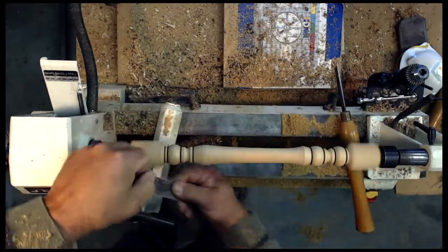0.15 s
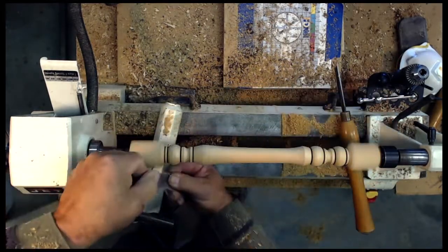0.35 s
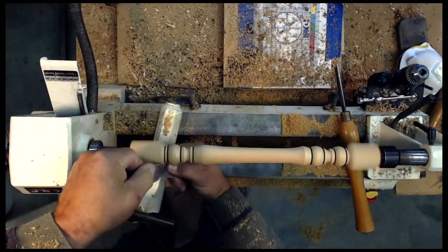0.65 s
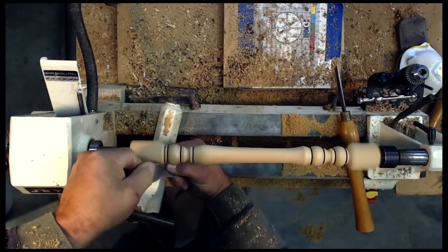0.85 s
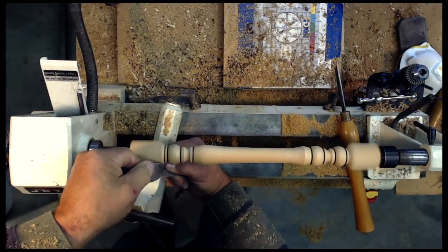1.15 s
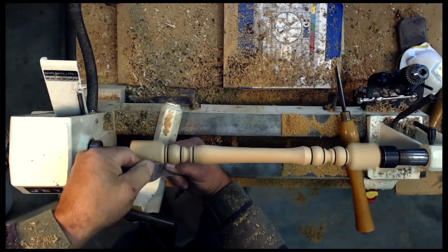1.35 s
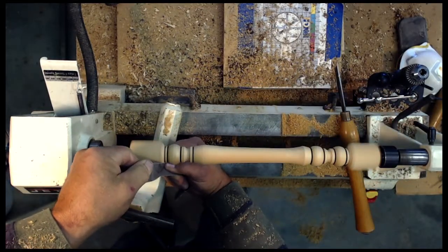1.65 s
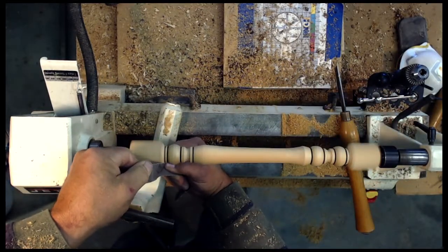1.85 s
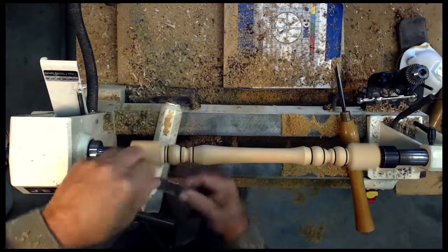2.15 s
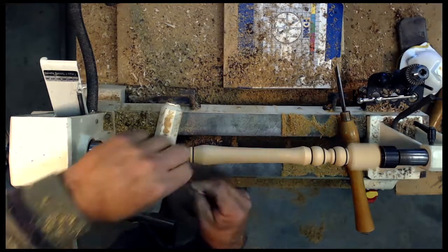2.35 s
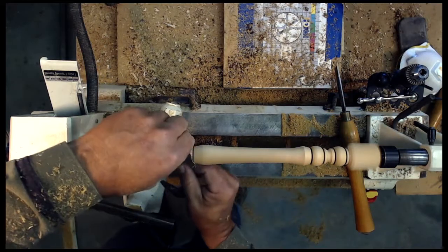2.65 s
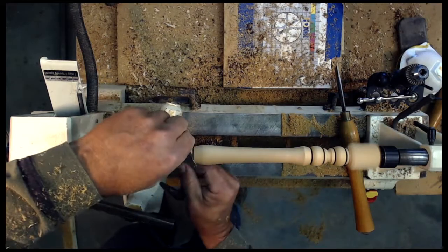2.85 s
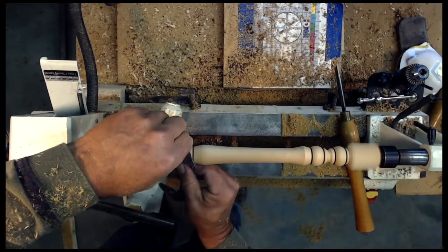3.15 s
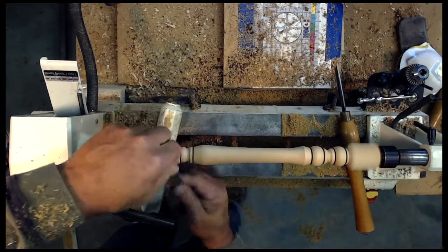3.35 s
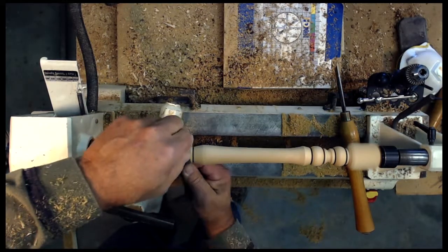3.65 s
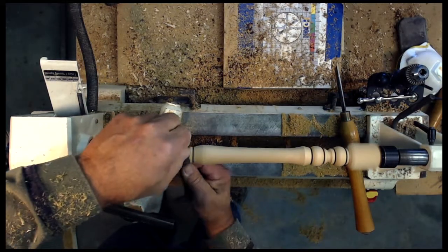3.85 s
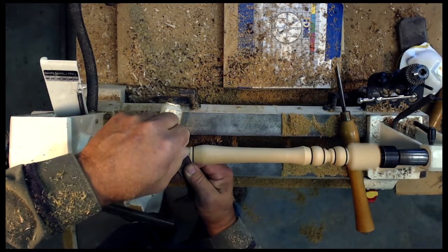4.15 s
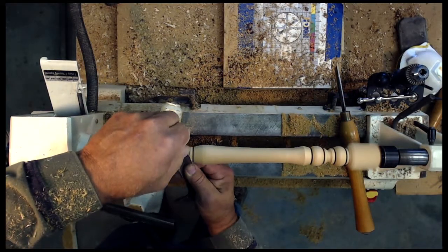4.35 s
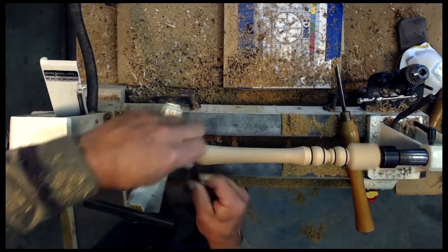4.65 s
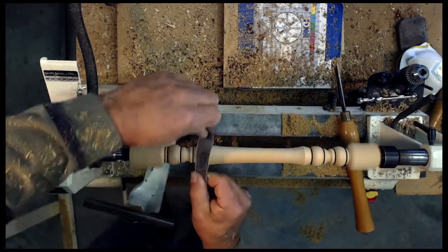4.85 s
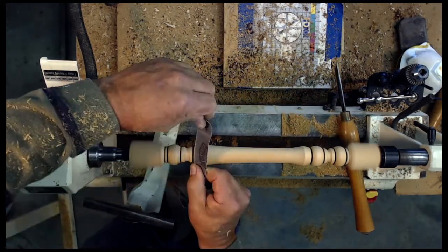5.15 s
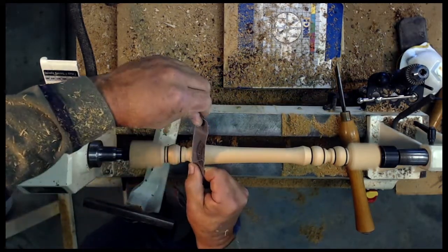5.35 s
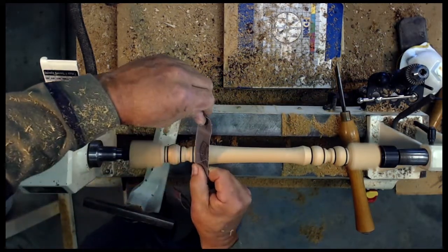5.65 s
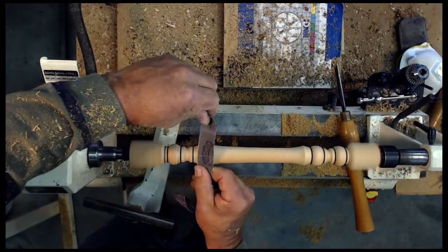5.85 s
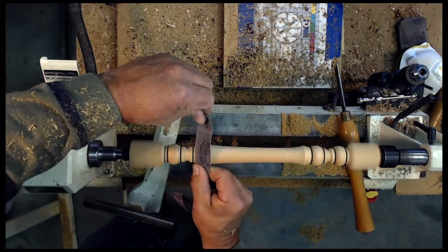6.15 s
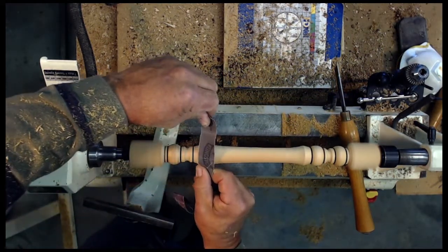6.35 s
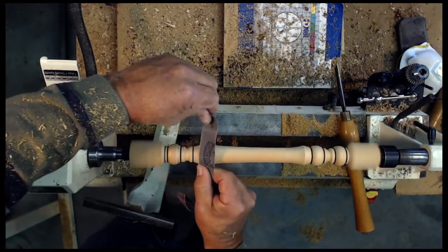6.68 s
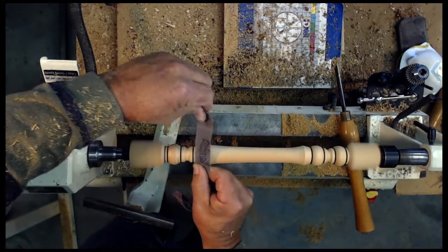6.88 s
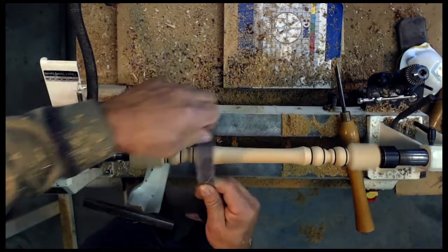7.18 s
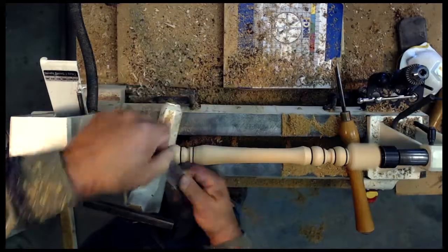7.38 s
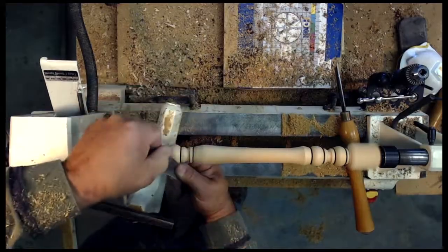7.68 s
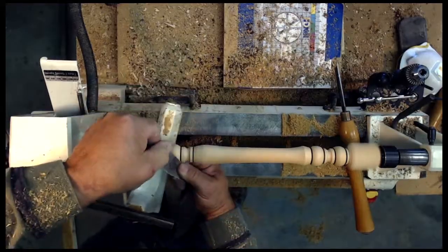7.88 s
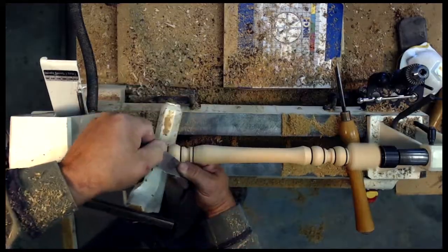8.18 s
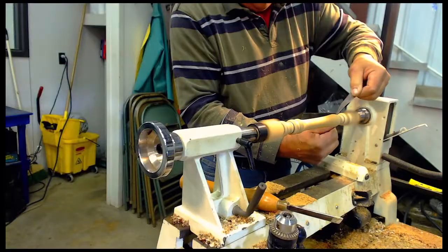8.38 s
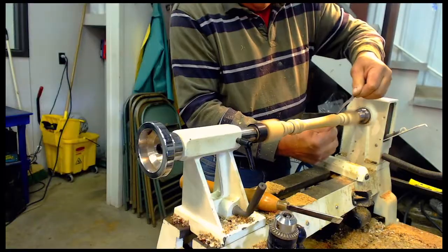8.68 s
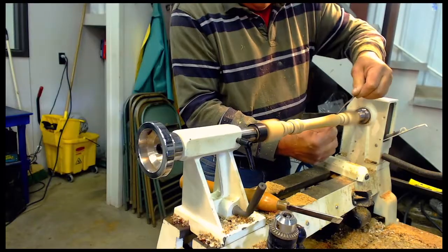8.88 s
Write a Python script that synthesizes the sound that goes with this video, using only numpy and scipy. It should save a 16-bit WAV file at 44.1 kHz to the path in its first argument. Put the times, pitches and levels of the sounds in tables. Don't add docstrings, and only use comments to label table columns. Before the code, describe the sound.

In a workshop, a wood lathe whirs at constant speed, humming and whistling. Sandpaper is pushed on and lifted off the turning spindle, making rough fluttering hisses with a hollow woody rasp beneath and occasional brief squeals. Middle strokes are much lighter, the last is hard and long. Close, narrow, low-quality mono pickup with watery artifacts and two tiny dropouts.

```python
import sys
import numpy as np
from scipy import signal
from scipy.fft import rfft, irfft
from scipy.io import wavfile
from scipy.ndimage import uniform_filter1d, map_coordinates

SR = 44100
rng = np.random.default_rng(int(sys.argv[2]) if len(sys.argv) > 2 else 0)


def gain_from_db(level_db):
    decades = np.asarray(level_db, float) / 20
    return 10 ** decades


def transcribe(signal):
    frames = np.atleast_2d(signal).T
    limited = np.clip(frames, -1, 1)
    pcm = np.round(limited * 32767).astype(np.int16)
    wavfile.write(sys.argv[1], SR, pcm)


N = 397782

TURN_HZ = 66.97
WHINE_HZ = 1246.3
COMB_HZ, STEP_HZ, PARTNER_HZ = 3470, 319.3, 79
LOUDEST_WHISTLE = 3
ROAR_DB = -34
SHADE_S, SHADE_LENGTH_S, SHADE_DB = 4.92, .07, -2.5
LIFT_OFF_S = .15
TUG_RISE_S, TUG_FALL_S = 0.0083, 0.012
WOOD_LAG, USUAL_DB = .3, -17.5
SING_Q = 30
MIC_LIMIT = 1.5
PACKET_S, PACKET_MID = 1024 / 48000, .58
THIN_FADE_S, FADE_IN_S = .02, .017

# time in seconds, motor whine level in dB, third shaft order level in dB.
LOAD = [(0.0, -46, -70), (.22, -41, -60), (1.48, -42.5, -52.5), (2.28, -43.5, -56.5), (3.2, -40.5, -55),
        (4.42, -41.5, -55.5), (4.67, -42.5, -51.5), (4.92, -43, -57), (5.33, -40.5, -48.5),
        (5.8, -49.5, -46.5), (6.35, -44, -49), (6.53, -51.5, -53), (6.86, -47.5, -46.5), (7.16, -46, -50.5),
        (7.28, -43, -59), (7.74, -42, -58), (8.82, -44.5, -57.5), (9.02, -36.5, -59)]
# order, level in dB re the third.
LOADED_ORDERS = [(3, 0), (5, -11.5), (11, -11), (12, -3.5), (13, -5.5), (14, -10), (16, -15), (19, -7.5),
                 (20, -11)]
# frequency in Hz, level in dB.
MAINS = [(60, -62), (120, -63), (180, -67.5), (240, -52.5), (300, -66), (360, -76)]
# order, level in dB.
SHAFT_ORDERS = [(1, -61.5), (2, -64), (4, -58.5), (6, -70), (9, -56.5)]
# frequency in Hz, level in dB.
BELT = [(88, -82.5), (100, -79), (131, -71), (150.3, -63), (211, -71.5), (277, -62.5), (411, -66),
        (681, -65), (1082, -54)]
# frequency in Hz, level in dB.
BEARINGS = [(1367, -48), (1647, -53), (2304, -56), (2912, -58), (3230, -55), (3623, -55), (3951, -58),
            (4016, -57), (4904, -53)]
# whistle level in dB, partner level in dB.
WHISTLES = [(-63.5, -57.5), (-49.5, -53), (-52.5, -52), (-43, -53.5), (-50, -50), (-43.5, -53.5),
            (-56, -53), (-52, -52.5), (-52.5, -54), (-49, -46.5)]
# time in seconds, gain in dB.
WHISTLE_SWELL = [
    (0, 7),
    (.25, 2.5),
    (.5, -1.5),
    (2.2, -3),
    (2.45, 3.5),
    (2.8, 1),
    (4.7, -7),
    (7.1, -7),
    (7.4, -0.5),
]
# frequency in Hz, density in dB per Hz.
ROAR = [(15, -54.5), (25, -17), (58, -28), (161, -17), (235, -11.5), (327, -20.5), (603, -11), (944, -13),
        (1250, -8), (1480, -10), (2100, -10), (3370, -10.5), (4910, -5.5), (5400, -10), (6520, -9),
        (7000, -15), (9100, -54.5), (15400, -120)]
# time in seconds, level in dB.
STROKES = [
    [(0.73, -43), (0.748, -20.5), (0.916, -13), (1.254, -17), (1.45, -16), (1.526, -20), (1.944, -17.5),
     (2.108, -20.5), (2.16, -39.5)],
    [(2.77, -39.5), (2.832, -26.5), (2.884, -7.5), (3.132, -16.5), (3.164, -10), (3.272, -19),
     (3.354, -22.5), (3.372, -30.5), (3.42, -33.5)],
    [(3.77, -52.5), (3.806, -23), (3.86, -18), (4.052, -19), (4.128, -36.5), (4.178, -41), (4.192, -16),
     (4.298, -15), (4.36, -18)],
    [(4.47, -20.5), (4.48, -16), (4.58, -11), (4.694, -18.5), (4.72, -37.5)],
    [(4.96, -49.5), (5.02, -25), (5.376, -25.5), (5.394, -18.5), (5.454, -24.5), (6.184, -25.5),
     (6.194, -19.5), (6.324, -26), (6.52, -20.5)],
    [(6.59, -23), (6.606, -23.5), (6.68, -31.5), (6.71, -28), (6.91, -25), (7.068, -29), (7.136, -24),
     (7.24, -36)],
    [(7.67, -32.5), (7.73, -8.5), (7.902, -20.5), (8.108, -20), (8.418, -21), (8.658, -14), (8.804, -23),
     (9.012, -13), (9.02, -22)],
]
# time in seconds, change in dB.
TUGS = [(.836, 2.5), (.924, 4.5), (1.442, 1), (1.924, 1.5), (5.015, 2), (5.035, -6), (5.058, 0), (5.41, 2),
        (5.435, -3), (5.484, 7.5), (5.68, 3.5), (6.206, 1), (6.514, 2), (6.72, 3.5), (7.134, 2), (7.73, 4),
        (7.86, 0.5), (8.03, -3), (8.078, 4), (8.67, -1), (8.928, -2)]
# time in seconds, wood body level in dB re hiss, hiss centre in Hz,
# lift there in dB, turn-to-turn likeness from 0 to 1.
GRIP = [(.75, -17.5, 4270, 1, 0.6), (1.15, -13.5, 5460, 2, 0.64), (1.6, -14, 5520, 2.5, 0.74),
        (1.9, -12.5, 5710, 3.5, 1), (2.101, -13, 5140, 1, .2), (2.9, -15, 5690, 7.5, 0.4),
        (3.149, -6.5, 5730, 4, .4), (3.901, -18.5, 5640, 2.5, .3), (4.3, -14.5, 5610, 5, 0.6),
        (4.65, -15.5, 6080, 7, .4), (5.1, -15, 6150, 2.5, 0.4), (6.201, -14, 6250, 6.5, .3),
        (7.1, -14, 5930, 9, 0.2), (7.73, -22.5, 4860, 9, .4), (7.92, -12, 5220, 6.5, 0.2),
        (8.159, -8.5, 4230, 1.5, 0.67), (8.669, -14.5, 5660, 9, 0.62), (9.0, -11, 5580, 1.5, .6)]
# frequency in Hz, density in dB per Hz.
GRIT = [(1650, -45), (2800, -10.5), (3140, -17.5), (3470, -7), (4000, -3), (5630, -4), (6510, -1),
        (7000, -2.5), (9100, -29.5), (15400, -120)]
# frequency in Hz, density in dB per Hz.
WOOD = [(290, -62.5), (500, -34.5), (848, -13), (1060, -19), (1210, -15), (1870, -2), (2100, -8),
        (3600, -1), (4680, -18), (7920, -120)]
LOBES = [(1, .08), (2, .11), (3, .06), (4, .06)]
# start in seconds, end in seconds, frequency in Hz, lift in dB.
SINGS = [(.745, .9, 3800, 5), (.8, 1.02, 4200, 7), (1.05, 1.5, 6330, 6), (1.3, 1.62, 3550, 4),
         (1.55, 2.05, 1850, 4), (2.86, 2.92, 1900, 6), (3.12, 3.25, 1944, 3), (3.1, 3.3, 2550, 3),
         (1.2, 1.5, 4000, 3), (4.19, 4.25, 1800, 5), (3.85, 3.97, 2900, 5), (4.5, 4.68, 6500, 5),
         (4.5, 4.7, 4000, 3), (5.28, 5.52, 2950, 7), (6.7, 6.75, 1800, 7), (7.715, 7.79, 4700, 11),
         (8.25, 8.42, 3700, 6), (8.42, 8.58, 4100, 6), (8.5, 8.75, 2200, 8), (8.6, 8.72, 5680, 5),
         (5.06, 5.3, 3850, 5), (5.5, 5.62, 4000, 4), (8.8, 8.88, 6400, 8), (8.89, 8.96, 4700, 11)]
# start in seconds, end in seconds, centre in Hz, spread in Hz, level in dB.
LOCKS = [
    (1.6, 2.04, 3548, 25, -28),
    (1.56, 2.04, 3600, 150, -35.5),
    (1.558, 2.04, 5550, 210, -32),
    (1.6, 2.04, 6250, 259, -39),
    (8.07, 8.26, 3348, 18, -26),
    (8.135, 8.182, 3348, 65, -23),
    (8.047, 8.27, 2350, 260, -35.5),
    (8.042, 8.276, 2850, 170, -34),
    (8.043, 8.285, 3600, 230, -32.5),
    (8.608, 8.706, 5670, 30, -16),
]
# start in seconds, end in seconds, frequency in Hz, level in dB.
SQUEAL = (8.5, 8.64, 5483, -21)
# start in seconds, end in seconds, rate in Hz, centre in Hz, spread in Hz,
# level in dB.
CHATTER = (8.966, 9.03, 267, 2670, 1500, -27)
THIN = [15, 23, 81, 110, 120, 147, 156, 184, 191, 202, 214, 223, 243, 246, 250, 253, 256, 259, 268, 280,
        283, 340, 392, 411, 420]
THIN_PAIRS = [3, 343, 357]
# frequency in Hz, gain in dB.
EDGE = [(6500, 0), (6900, -4), (7200, -11), (7450, -12.5), (7700, -62.5), (8000, -100)]
# cut in seconds, cut length in seconds, residue level in dB,
# residue length in seconds, return in seconds.
DROPS = [
    (4.362, 0.0015, -26.5, 0.024, 4.46),
    (6.5206, .0001, -19.5, .031, 6.579),
]


def evened(x):
    return x / np.sqrt(np.mean(abs(x) ** 2) + 1e-20)


def read(points, hz):
    f, value = np.transpose(points)
    return np.interp(np.log(hz + 1), np.log(f + 1), value)


def patches(shape, bins, frames):
    field = uniform_filter1d(rng.standard_normal(shape), int(bins), 0)
    return evened(uniform_filter1d(field, int(frames), 1))


def tone(hz, db, waver, width_hz, size=N):
    t = np.arange(size) / SR
    knots = np.arange(0, t[-1] + 1, 1 / width_hz)
    a, b = rng.standard_normal((2, len(knots)))
    drift = 1 + waver * (np.interp(t, knots, a) + 1j * np.interp(t, knots, b))
    carrier = np.exp(2j * np.pi * (hz * t + rng.random()))
    return np.sqrt(2) * gain_from_db(db) * (evened(drift) * carrier).real


def whistles(t):
    out = np.zeros(N)
    for k, (db, partner_db) in enumerate(WHISTLES):
        if k == LOUDEST_WHISTLE:
            db = db + np.interp(t, *np.transpose(WHISTLE_SWELL))
        hz = COMB_HZ + k * STEP_HZ
        out += tone(hz, db + 1, .3, 4)
        out += tone(hz + PARTNER_HZ, partner_db + 1, .3, 4)
    return out


def roar():
    hz, _, z = signal.stft(rng.standard_normal(N), SR, nperseg=2048)
    colour = gain_from_db(read(ROAR, hz)[:, None] + 2.1 * patches(z.shape, 20, 4.3))
    return gain_from_db(ROAR_DB) * evened(signal.istft(z * colour, SR, nperseg=2048)[1][:N])


def lathe():
    t, (s, whine_db, third_db) = np.arange(N) / SR, np.transpose(LOAD)
    out = tone(WHINE_HZ, np.interp(t, s, whine_db), .12, 8)
    loaded = sum(tone(k * TURN_HZ, db, 0.27, 3.7) for k, db in LOADED_ORDERS)
    out += gain_from_db(np.interp(t, s, third_db)) * loaded
    out += sum(tone(hz, db, .05, 1.4) for hz, db in MAINS)
    out += sum(tone(k * TURN_HZ, db, 0.41, 3) for k, db in SHAFT_ORDERS)
    out += sum(tone(hz, db, 0.59, 4.5) for hz, db in BELT)
    out += sum(tone(hz, db + .5, .65, 7) for hz, db in BEARINGS)
    out += whistles(t) + roar()
    return out * gain_from_db(SHADE_DB * np.exp(-((t - SHADE_S) / SHADE_LENGTH_S) ** 2))


def pressure(t):
    rows = [(STROKES[0][0][0] - .02, -80)]
    for stroke, after in zip(STROKES, STROKES[1:] + [None]):
        rows += stroke
        if after and after[0][0] - stroke[-1][0] > LIFT_OFF_S:
            rows += [(stroke[-1][0] + .026, -80), (after[0][0] - .02, -80)]
    tugs = sum(db * np.exp(-((t - s) / np.where(t < s, TUG_RISE_S, TUG_FALL_S)) ** 2) for s, db in TUGS)
    return np.interp(t, *np.transpose(rows)) + tugs


def surface(likeness):
    cells = 660
    turns = np.arange(N) * TURN_HZ / SR
    rough = rng.standard_normal((len(likeness), cells))
    for k in range(1, len(rough)):
        rough[k] = likeness[k] * rough[k - 1] + np.sqrt(1 - likeness[k] ** 2) * rough[k]
    return evened(map_coordinates(rough.ravel(), [turns * cells], order=3))


def singing(hz, frames):
    lift = 0
    for start, end, f, db in SINGS:
        peak = np.exp(-.5 * ((hz[:, None] / f - 1) * SING_Q) ** 2)
        gate = np.interp(frames, [start - .015, start, end, end + 0.0072], [0, 1, 1, 0])
        lift = lift + db * peak * gate
    return lift


def sanding():
    s, body_db, strip_hz, lift_db, like = np.transpose(GRIP)
    turn_times = np.arange(int(N / SR * TURN_HZ) + 3) / TURN_HZ
    like = np.clip(np.interp(turn_times, s, like), .01, .97)
    hz, frames, grit = signal.stft(surface(like ** 1.38), SR, nperseg=512, noverlap=384)
    wood = signal.stft(surface(like ** 0.43), SR, nperseg=512, noverlap=384)[2]
    sung = gain_from_db(singing(hz, frames))

    bump = np.exp(-.5 * ((hz[:, None] - np.interp(frames, s, strip_hz)) / 700) ** 2)
    streaks = 2.8 * patches(grit.shape, 2, 60)
    colour = sung * gain_from_db(read(GRIT, hz)[:, None] + np.interp(frames, s, lift_db) * bump + streaks)
    colour /= np.sqrt(np.mean(colour ** 2, 0))

    body = evened(gain_from_db(read(WOOD, hz)[:, None] + 1.9 * patches(wood.shape, 2.4, 50)))
    lag_db = WOOD_LAG * np.clip(pressure(frames) - USUAL_DB, -20, 20)
    body *= gain_from_db(np.interp(frames, s, body_db) - lag_db)
    rub = signal.istft(grit * colour + wood * body * sung, SR, nperseg=512, noverlap=384)[1][:N]

    t = np.arange(N) / SR
    lobes = 1 + sum(d * np.cos(2 * np.pi * (k * TURN_HZ * t + rng.random())) for k, d in LOBES)
    flicker_db = patches((1, N), 1, 250)[0]
    return rub * lobes * gain_from_db(pressure(t) + flicker_db)


def held(start, end, lines):
    out, first = np.zeros(N + SR), round((start - .01) * SR)
    t = np.arange(first, round((end + 0.054) * SR)) / SR
    gate = np.interp(t, [start - .01, start, end - .02, end + 0.018], [0, 1, 1, 0])
    out[first:first + len(t)] = gate * sum(tone(hz, db - 1.5, .35, 14, size=len(t)) for hz, db in lines)
    return out[:N]


def stack(rate_hz, centre_hz, spread_hz, db):
    hz = rate_hz * (round(centre_hz / rate_hz) + np.arange(-7, 8))
    uneven_db = 3.5 * rng.standard_normal(len(hz))
    return zip(hz, db - 2.8 * ((hz - centre_hz) / spread_hz) ** 2 + uneven_db)


def slaps():
    locks = sum(held(start, end, stack(TURN_HZ, *shape)) for start, end, *shape in LOCKS)
    squeal = held(*SQUEAL[:2], [SQUEAL[2:]])
    chatter = held(*CHATTER[:2], stack(*CHATTER[2:]))
    return locks + squeal + chatter


def scene():
    return np.tile(lathe() + sanding() + slaps(), (2, 1))


def thinned(x):
    hz, _, z = signal.stft(x, SR, nperseg=2048, noverlap=1536)
    strong = abs(z) > gain_from_db(-13) * abs(z).max(0)
    spared = abs(hz[:, None] - 3420) > 3300
    sparse = signal.istft(z * (strong | spared), SR, nperseg=2048, noverlap=1536)[1][:N]
    t = np.arange(N) / SR
    packets = np.array(THIN + THIN_PAIRS + [n + 1 for n in THIN_PAIRS])
    mids = (packets + PACKET_MID) * PACKET_S
    share = sum(np.cos(np.pi / 2 * np.clip((t - s) / THIN_FADE_S, -1, 1)) ** 2 for s in mids)
    return x + np.minimum(share, 1) * (sparse - x)


def dropouts(x):
    t = np.arange(N) / SR
    for cut, fall, rest_db, rest, back in DROPS:
        residue = gain_from_db(rest_db) * np.cos(np.pi / 2 * np.clip((t - cut) / rest, 0, 1)) ** 2
        going = np.cos(np.pi / 2 * np.clip((t - cut) / fall + 1, 0, 1)) ** 2
        coming = np.sin(np.pi / 2 * np.clip((t - back) / FADE_IN_S, 0, 1)) ** 2
        x = x * (going + (1 - going) * residue + coming)
    return x


def top_cut(x):
    return signal.sosfilt(signal.butter(12, 7460, fs=SR, output="sos"), x)


def record(dry):
    capsule = MIC_LIMIT * np.tanh(dry[0] / MIC_LIMIT)
    hz = np.fft.rfftfreq(N, 1 / SR)
    dulled = irfft(rfft(thinned(capsule)) * gain_from_db(read(EDGE, hz)), N)
    mix = np.tile(np.clip(dropouts(dulled), -1, 1), (2, 1))
    return top_cut(mix)


dry = scene()
out = record(dry)
transcribe(out)
```